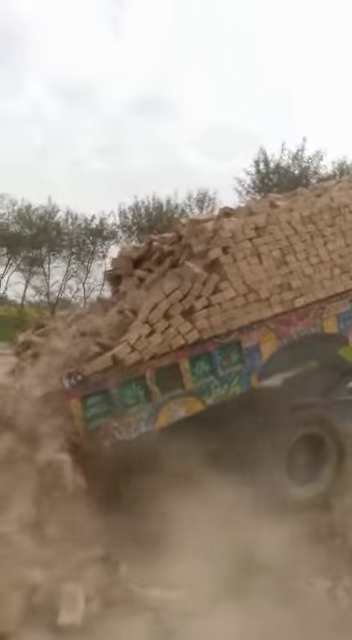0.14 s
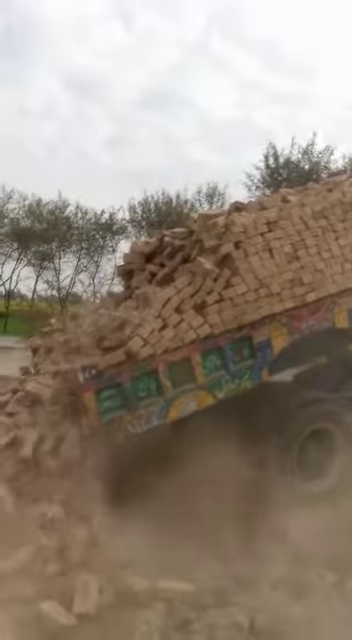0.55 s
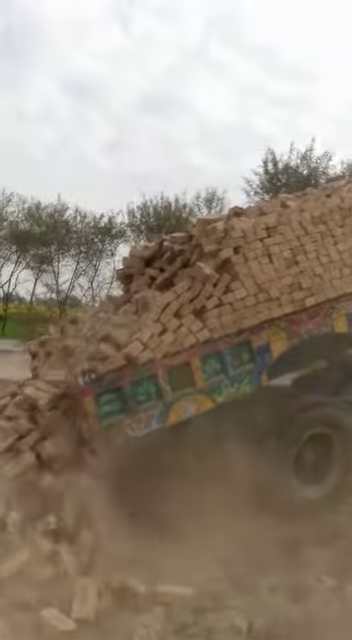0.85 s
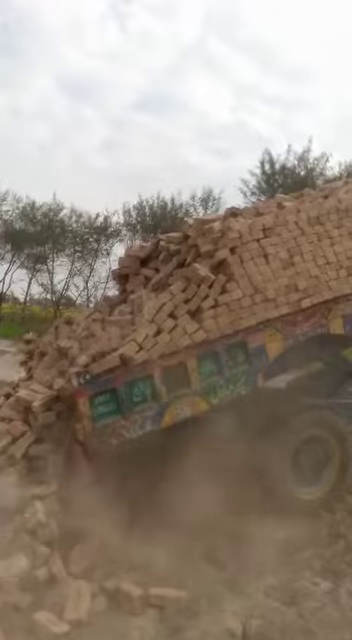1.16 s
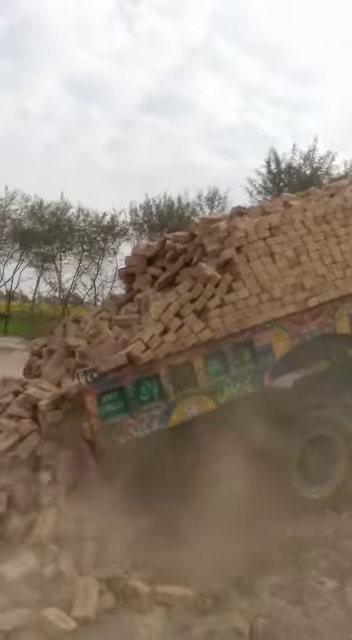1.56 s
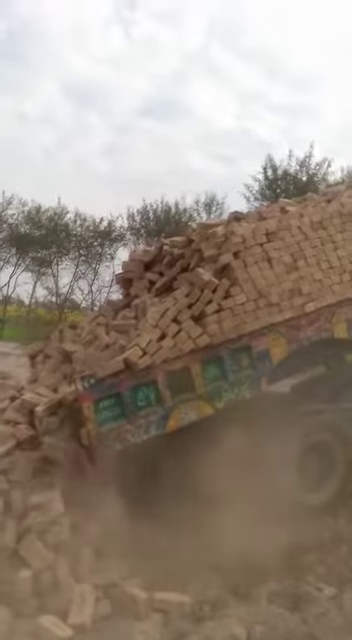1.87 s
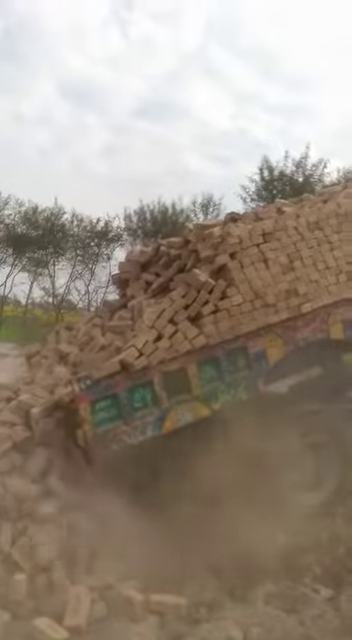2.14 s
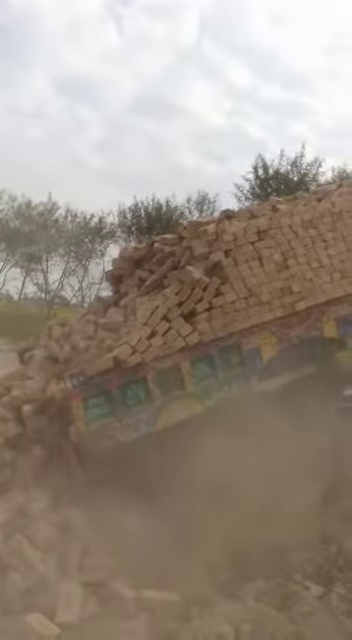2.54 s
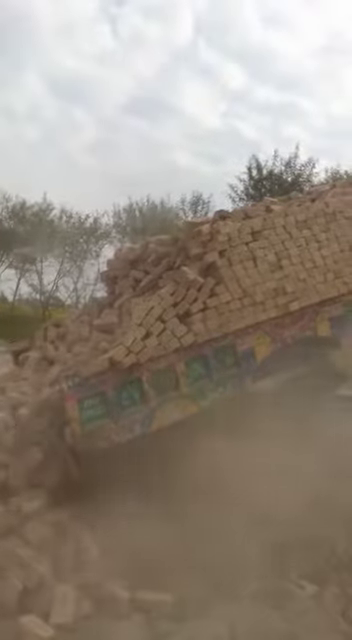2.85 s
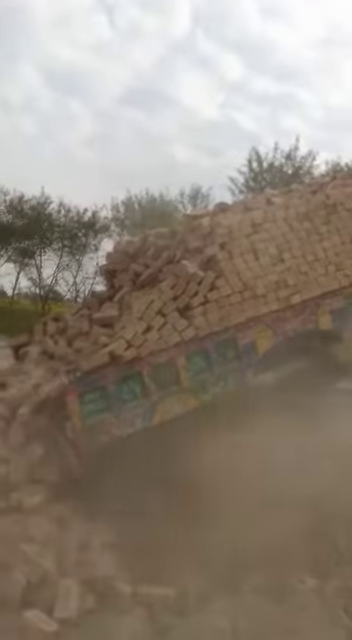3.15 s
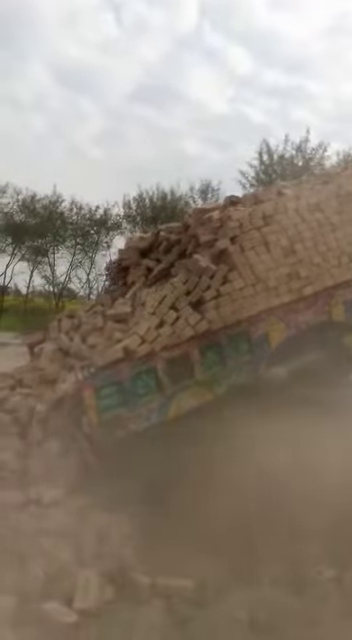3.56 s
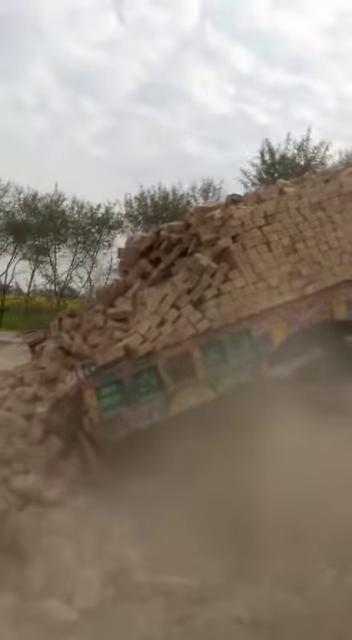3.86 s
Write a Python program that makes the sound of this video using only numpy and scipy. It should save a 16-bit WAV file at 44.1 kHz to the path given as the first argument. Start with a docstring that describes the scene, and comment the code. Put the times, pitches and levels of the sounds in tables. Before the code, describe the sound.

Fired bricks tumbling onto a rubble pile, sharp dry clinks thinning out over a faint tractor engine

```python
"""Fired bricks slide off a tipped trolley onto a heap, outdoors, while a tractor runs nearby.
At once the near bricks clink in a few short tones each, knock and grind, and the trolley bed thumps;
random grains and many tiny far clinks make the rubble clatter, which thins out over three seconds.
From about two seconds the tractor, a train of exhaust puffs with rumble and whine, drops to idle.
Near three seconds low noise swells as wind nudges the microphone; a last few bricks then strike."""
import sys
import numpy as np
from scipy import signal
from scipy.fft import rfft, irfft
from scipy.io import wavfile

SR = 44100
rng = np.random.default_rng(int(sys.argv[2]) if len(sys.argv) > 2 else 0)


def output_pcm(signal):
    """Save a mono or channel-first signal as 16-bit PCM at the path in sys.argv[1].

    Samples are clipped to [-1, 1] before scaling.
    """
    pcm = np.clip(np.atleast_2d(signal).T, -1, 1) * 32767
    wavfile.write(sys.argv[1], SR, np.round(pcm).astype(np.int16))


N = 176400
T = np.arange(N) / SR
AGE = T[:SR // 2]  # seconds since a sound began

# The ringing bricks. Each row: start in seconds, time for the first tone to fade by 60 dB in seconds,
# then for each tone its pitch in Hz and level in dB.
BRICK_RINGS = [ (.048, .15, 2215, -29, 2770, -33.5, 4540, -42.5), (.062, .096, 2205, -21, 2075, -25),
               (.073, .055, 1684, -13, 2196, -14.5, 1950, -27), (.127, .42, 3480, -36.5, 5660, -45),
               (.160, .13, 4230, -41, 1357, -33, 6250, -37), (.213, .07, 4430, -33, 2115, -31),
               (.420, .07, 4495, -37, 4800, -44), (.436, .14, 2526, -28.5, 2074, -28.5, 1436, -35.5),
               (.461, .085, 2067, -12, 4070, -30.5, 2305, -26),
               (.48, .069, 1528, -23.5, 1670, -26, 3480, -31), (.514, .09, 2804, -26, 1354, -33, 5580, -38),
               (.535, .054, 2730, -26, 4110, -32), (.575, .12, 5130, -37, 2476, -42, 8450, -52),
               (.612, .27, 2002, -38, 2430, -39.5), (.714, .065, 4230, -28),
               (.781, .054, 3492, -15, 2393, -20, 4740, -31.5),
               (.795, .18, 2559, -27.5, 3476, -31, 1464, -32), (.826, .05, 6400, -40),
               (.868, .11, 3420, -28, 3805, -37), (.922, .21, 3999, -35, 2305, -35.5),
               (.961, .17, 2306, -16, 3451, -36, 5110, -43, 2399, -27),
               (.982, .093, 4250, -35.5, 3450, -31, 2980, -39), (1.067, .21, 2858, -29, 6240, -41.5),
               (1.305, .135, 2438, -18.5, 3313, -28, 2778, -37), (1.33, .09, 2060, -35),
               (1.430, .18, 2115, -39.5, 4490, -47), (1.628, .077, 1890, -28, 4710, -35, 1516, -31),
               (1.652, .16, 3004, -21, 4130, -43),
               (1.773, .12, 1675, -24.5, 1465, -25.5, 4050, -42, 4780, -45),
               (1.791, .16, 1560, -26, 1373, -28, 3257, -39), (1.808, .13, 624, -34),
               (1.948, .083, 1884, -40, 1717, -41), (1.992, .039, 3350, -32, 4230, -39),
               (2.120, .095, 2120, -25.5, 4877, -31.5, 5100, -29), (2.33, .08, 6420, -46),
               (2.408, .22, 2895, -43.5), (2.584, .12, 1749, -38),
               (2.937, .17, 2225, -32, 4828, -38, 3350, -44),
               (3.020, .12, 1864, -18, 2085, -20.5, 4845, -35, 2891, -38, 4253, -44),
               (3.565, .25, 2170, -44), (3.608, .2, 4570, -47),
               (3.641, .1, 3160, -34, 2150, -32, 3400, -38), (3.661, .04, 1290, -19, 5200, -25, 6300, -31),
               (3.666, .15, 2379, -24.5, 2702, -29.5, 824, -33, 2514, -34, 5200, -41),
               (3.779, .22, 1732, -41), (3.915, .08, 1900, -17.5, 2880, -34, 4700, -39.5),
               (3.946, .13, 2326, -27, 2120, -37, 1910, -37)]
RING_RISE_S = .0025
HIGHEST_PITCH_HZ = 6500  # upper limit for far clinks and for the modes of a contact


def from_db(db):
    """Turn decibels into a gain."""
    return 10 ** (np.asarray(db) / 20)


def rms_one(x):
    """Scale a sound to an average strength (rms) of 1."""
    return x / np.sqrt(np.mean(x ** 2) + 1e-20)


def add(out, start_s, sound):
    """Mix a sound in at its start time, cutting what runs past the end."""
    first = int(np.clip(start_s * SR, 0, N - 1))
    out[first:first + len(sound)] += sound[:N - first]


def blow(rise_s, t60_s):
    """Loudness of a blow: a quick rise, and a fade that loses 60 dB in t60_s."""
    return (1 - np.exp(-AGE / rise_s)) * from_db(-60 * AGE / t60_s)


def ring(t60_s):
    """Loudness of a brick: it swells quickly, then is damped ever harder as it beds down."""
    bedding = 1.282  # above 1, the fade speeds up
    return (1 - np.exp(-AGE / RING_RISE_S)) * from_db(-60 * (AGE / t60_s) ** bedding)


def coloured(x, spectrum):
    """Filter a sound so its pitches are balanced as the table says; rms 1."""
    hz, db = np.transpose(spectrum)
    f = np.maximum(np.fft.rfftfreq(len(x), 1 / SR), 1)
    below = np.minimum(f / hz[0], 1) ** 2  # fades out under the first pitch
    balance = from_db(np.interp(np.log(f), np.log(hz), db))
    return rms_one(irfft(rfft(x) * below * balance, len(x)))


def waver(hz, size):
    """Slow random wandering as complex numbers, mostly slower than hz; rms about 1."""
    step = 20  # samples between the points, joined by straight lines
    f = np.fft.fftfreq(size // step, step / SR)
    noise = rng.standard_normal((len(f), 2)) @ [1, 1j]
    slow = np.fft.ifft(np.fft.fft(noise) / (1 + (f / hz) ** 2))
    slow /= np.sqrt(np.mean(abs(slow) ** 2))
    return np.interp(np.arange(size) / step, np.arange(len(f)), slow)


def grit(grains_per_s):
    """Random clicks of uneven size over a little dust noise; rms about 1."""
    spread_db, grain_share = 2.4, .59  # share of the power that is clicks
    sizes = from_db(spread_db * np.minimum(rng.exponential(1, N), 5)) * rng.choice([-1, 1], N)
    grains = rms_one(sizes * (rng.random(N) < grains_per_s / SR))
    return np.sqrt(grain_share) * grains + np.sqrt(1 - grain_share) * rng.standard_normal(N)


def contact(hz, octaves, t60_s, count=20):
    """Unevenly spaced short modes around a centre pitch, struck together; starts near rms 1."""
    rise_s = .0006
    age = AGE[:SR // 8]
    place, strength, length = rng.random((3, count, 1))
    offset = 2 * (np.arange(count)[:, None] + place) / count - 1
    pitches = hz * 2 ** (octaves * offset)
    gains = (.5 + strength) * np.exp(-2 * offset ** 2)  # strongest near the centre
    gains = gains * (pitches < HIGHEST_PITCH_HZ) * rng.choice([-1, 1], (count, 1))
    fade = np.exp(-np.log(1000) * age / (t60_s * (.5 + length)))
    modes = gains * np.sin(2 * np.pi * pitches * age) * fade
    return np.sqrt(2) * (1 - np.exp(-age / rise_s)) * modes.sum(axis=0) / np.linalg.norm(gains)


def wind():
    """Wind nudges the microphone: low noise swells and sinks in soft buffets."""
    # Each row: time of the peak in seconds, length scale in seconds, level in dB.
    buffets = [(2.675, 0.11, -54), (2.913, 0.084, -47.5), (3.084, 0.037, -52)]
    # Balance of the wind noise. Each row: pitch in Hz, relative level in dB per Hz.
    wind_balance = [(25, -13), (55, 3), (100, 1), (200, -22), (400, -60)]
    swell = sum(from_db(db) * np.exp(-2 * ((T - peak_s) / length_s) ** 2)
                for peak_s, length_s, db in buffets)
    return coloured(rng.standard_normal(N), wind_balance) * swell


def tractor():
    """One dull, nearly equal exhaust puff for each firing, a low rumble and a faint whine."""
    # The engine drops to idle. Each row: time in seconds, firings per second.
    firing_rate = [(0, 24.8), (1.85, 24.6), (2.25, 23.2), (2.6, 20.6), (4, 20.5)]
    # Balance of puffs and rumble. Each row: pitch in Hz, relative level in dB per Hz.
    exhaust_balance = [(25, -24.5), (48, 11.5), (74, 17), (100, 9), (130, -12.5), (172, 13.5), (230, -25.5),
                       (600, -42)]
    puffs_db, puff_spread_db, rumble_db = -58.5, 2.3, -66
    whine_hz, whine_width_hz, whine_db = 945, 13, -61.5
    firings = np.cumsum(np.interp(T, *np.transpose(firing_rate))) / SR
    fired = np.flatnonzero(np.diff(np.floor(firings)))  # each whole number is one firing
    puffs = np.zeros(N)
    puffs[fired] = from_db(puff_spread_db * rng.standard_normal(size=200)[:len(fired)])
    whine = rms_one(np.real(waver(whine_width_hz, N) * np.exp(2j * np.pi * whine_hz * T)))
    rumble = coloured(rng.standard_normal(N), exhaust_balance)
    engine = from_db(puffs_db) * coloured(puffs, exhaust_balance)
    return engine + from_db(rumble_db) * rumble + from_db(whine_db) * whine


def rubble():
    """Clumps of crumbs and a dense clatter of short far clinks, all following the slide."""
    # How strongly the rubble slides. Each row: time in seconds, level in dB before crumbs_db or far_db.
    slide = [(0, -34.5), (.55, -37.5), (1.0, -41), (1.5, -43.5), (2.0, -47), (3.3, -49), (4, -46.5)]
    # Balance of the crumbs. Each row: pitch in Hz, relative level in dB per Hz.
    crumb_balance = [(130, -9), (260, -4.5), (480, -11), (680, -3), (900, -3.5), (1130, -12), (1400, -9.5),
                     (2200, -10), (3100, -18.5), (4600, -21), (6200, -29.5), (7500, -43), (13000, -56),
                     (15200, -39.5)]
    crumbs_db, grains_per_s, clump_db, clump_hz = -2.5, 2000, 2, 22
    far_db, far_per_s, far_t60_s = -6.5, 250, .11
    far_low_hz, tilt_db = 1277, -5  # tilt per octave
    far_follows = 1.4  # dB of far clinking per dB of slide
    slide_db = np.interp(T, *np.transpose(slide))
    clumps = from_db(clump_db * rms_one(np.real(waver(clump_hz, N))))
    crumbs = coloured(grit(grains_per_s) * clumps, crumb_balance)
    far, envelope = np.zeros(N), ring(far_t60_s)[:SR // 10]
    for when, pitch, strength in rng.random((int(far_per_s * N / SR), 3)):
        hz = far_low_hz * (HIGHEST_PITCH_HZ / far_low_hz) ** pitch
        gain = from_db(tilt_db * np.log2(hz / far_low_hz) + 10 * strength)
        add(far, when * N / SR, gain * envelope * np.sin(2 * np.pi * hz * AGE[:len(envelope)]))
    loudest_db = slide_db.max()
    far_level_db = far_db + loudest_db + far_follows * (slide_db - loudest_db)
    return from_db(crumbs_db + slide_db) * crumbs + from_db(far_level_db) * rms_one(far)


def thumps():
    """The loaded trolley bed booms briefly in a low mode and one overtone."""
    # Each row: start in seconds, level of the low mode in dB, its pitch in Hz.
    bed_booms = [(0.79, -22.5, 256.5), (0.816, -30, 273.5), (.889, -32, 253), (1.23, -28.5, 248),
                 (1.278, -30.5, 257), (1.297, -28, 315), (2.438, -43, 250), (3.939, -38, 348)]
    rise_s, t60_s, overtone_ratio, overtone_db = .002, .12, 2.35, -13
    out = np.zeros(N)
    for start_s, db, hz in bed_booms:
        phase = 2 * np.pi * hz * AGE
        tones = np.sin(phase) + from_db(overtone_db) * np.sin(overtone_ratio * phase)
        add(out, start_s, from_db(db) * blow(rise_s, t60_s) * tones)
    return out


def grinds():
    """A brick judders over others: an uneven, fading run of slips, each a small ringing contact."""
    # Each row: start in seconds, length in seconds, level of the first slip in dB, centre pitch in Hz.
    judders = [(.484, .065, -27.5, 1700), (.478, .07, -37, 3700), (.79, .049, -27, 680),
               (.793, .036, -31.5, 3700), (1.773, .07, -35.5, 630), (1.774, .07, -34, 1590),
               (1.771, .035, -47, 3700), (2.431, .036, -32.5, 850), (2.434, .024, -41.5, 4000),
               (3.645, .04, -38, 2400), (3.69, .03, -33, 720)]
    slips_per_s, slip_t60_s, spread_octaves = 170, .032, .8
    fade_db = 3  # lost over the run
    out = np.zeros(N)
    for start_s, length_s, db, hz in judders:
        gaps = rng.uniform(.5, 1.5, size=12) / slips_per_s
        edges = [contact(hz, spread_octaves, slip_t60_s) for _ in gaps[::2]]
        for k, age in enumerate(np.cumsum(gaps) - gaps[0]):
            if age < length_s:
                slip_db = db - fade_db * age / length_s
                add(out, start_s + age, from_db(slip_db) * edges[k // 2])  # two slips share an edge
    return out


def knocks():
    """The packed heap answers a blow dully; chips ring at the contact, and every struck brick sheds grit."""
    # Each row: start in seconds, knock level in dB, centre pitch in Hz,
    # typical time to fade by 60 dB in seconds, level of the crack of grit in dB.
    heap_blows = [ (.020, -37, 1230, .069, -54), (.050, -30, 1410, .083, -43), (.167, -32, 1150, .12, -34),
                  (.257, -27, 1210, .035, -50), (.424, -41, 800, .13, -35), (.461, -30, 1113, .078, -42),
                  (.511, -40, 1200, .08, -32), (.572, -43, 900, .07, -39), (.811, -26, 680, .08, -35),
                  (.868, -41, 900, .066, -37), (.964, -30, 875, .03, -42), (1.305, -22.5, 740, .075, -43),
                  (1.508, -52, 900, .05, -44), (1.628, -28, 880, .06, -42.5), (1.653, -27, 1000, .035, -44),
                  (1.992, -39.5, 760, .074, -50), (2.118, -41, 890, .059, -42), (2.179, -40, 950, .08, -50),
                  (2.216, -37, 1300, .04, -52), (2.333, -37, 980, .08, -54), (2.408, -35, 1150, .058, -52),
                  (2.937, -42, 900, .066, -40), (3.021, -25, 1300, .045, -43), (3.641, -38, 905, .12, -39),
                  (3.663, -19, 1050, .045, -35.5), (3.681, -29, 800, .043, -49),
                  (3.917, -38.5, 840, .13, -44), (3.943, -27, 1030, .07, -48)]
    # Balance of the crushed grit. Each row: pitch in Hz, relative level in dB per Hz.
    crack_balance = [(1500, -8), (2500, -2.5), (4500, 1.5), (6200, -3.5), (7300, -21), (9000, -23),
                     (13000, -33.5), (15200, -21.5)]
    spread_octaves, crack_rise_s, crack_t60_s, grains_per_s = .9, .0015, .05, 6000
    chip_hz, chip_t60_s, chip_db = 3800, .06, -6  # dB against the crack
    debris_db = -27  # grit shed by a ringing brick, against its loudest mode
    out, crushing = np.zeros(N), np.zeros(N)
    for start_s, db, hz, t60_s, crack_db in heap_blows:
        add(out, start_s, from_db(db) * contact(hz, spread_octaves, t60_s))
        add(out, start_s, from_db(crack_db + chip_db) * contact(chip_hz, 1, chip_t60_s))
        add(crushing, start_s, from_db(crack_db) * blow(crack_rise_s, crack_t60_s))
    for start_s, t60_s, *modes in BRICK_RINGS:
        add(crushing, start_s, from_db(max(modes[1::2]) + debris_db) * blow(RING_RISE_S, t60_s))
    return out + crushing * coloured(grit(grains_per_s), crack_balance)


def clinks():
    """Each brick rings in its own few modes, those above the first dying sooner."""
    treble_damping = .3  # fade time falls with pitch by this power
    roughness, rough_hz = .24, 90  # size and speed of the random wavering of each tone
    out = np.zeros(N)
    for start_s, t60_s, *modes in BRICK_RINGS:
        for hz, db in zip(modes[::2], modes[1::2]):
            rough = 1 + roughness * waver(rough_hz, len(AGE))
            tone = np.imag(rough * np.exp(2j * np.pi * hz * AGE))
            mode_t60_s = t60_s * (modes[0] / hz) ** treble_damping
            add(out, start_s, from_db(db) * tone * ring(mode_t60_s))
    return out


def yard(x):
    """Faint dull scatter from the heap and the trolley: a short fading noise smears the sound."""
    echo_db, rise_s, t60_s, cut_hz = -22, .026, .12, 5600
    dull = signal.butter(2, cut_hz, fs=SR, output="sos")
    tail = signal.sosfilt(dull, rng.standard_normal(len(AGE))) * blow(rise_s, t60_s)
    return from_db(echo_db) * signal.fftconvolve(x, tail / np.linalg.norm(tail))[:N]


def scene():
    """Near bricks and their scatter over rubble, tractor and wind."""
    background = wind() + tractor() + rubble()
    bricks = thumps() + grinds() + knocks() + clinks()
    return (background + bricks + yard(bricks))[None]


def record(dry):
    """A steep filter cuts the top above 15900 Hz."""
    return signal.sosfilt(signal.ellip(10, .1, 70, 15900, fs=SR, output="sos"), dry)


dry = scene()
out = record(dry)
output_pcm(out)
```